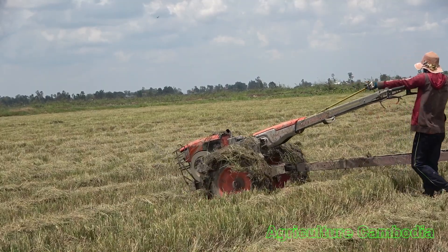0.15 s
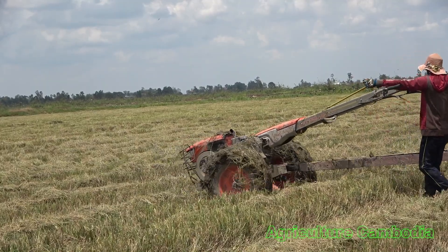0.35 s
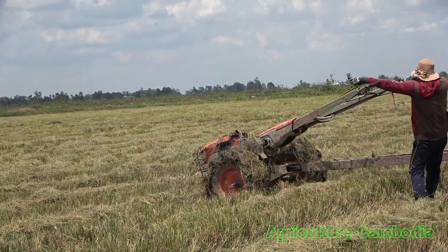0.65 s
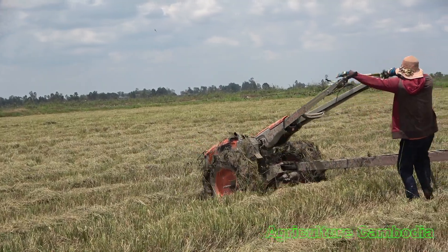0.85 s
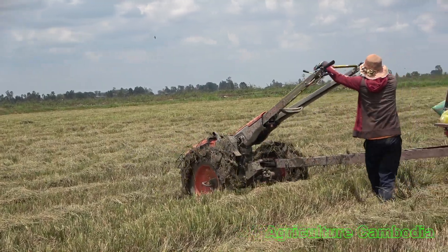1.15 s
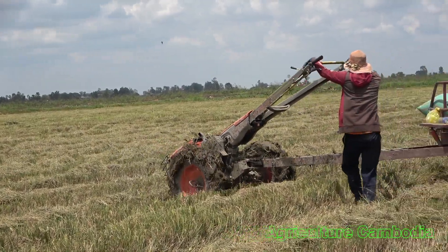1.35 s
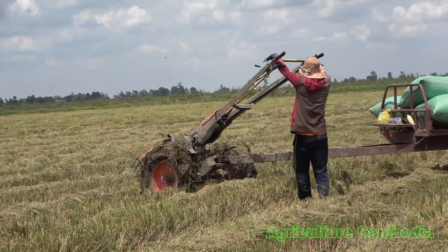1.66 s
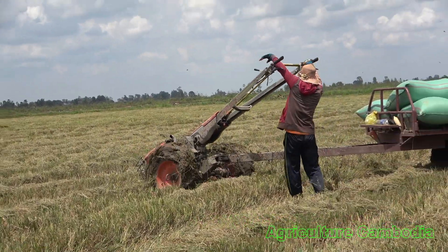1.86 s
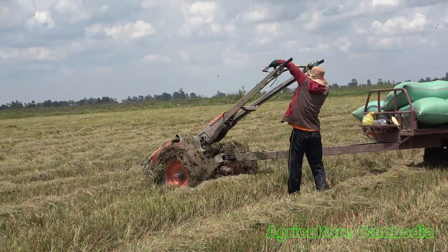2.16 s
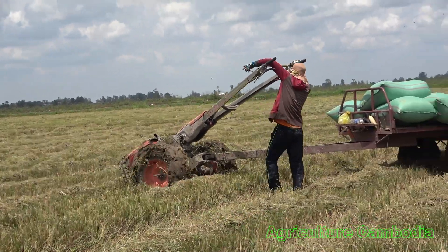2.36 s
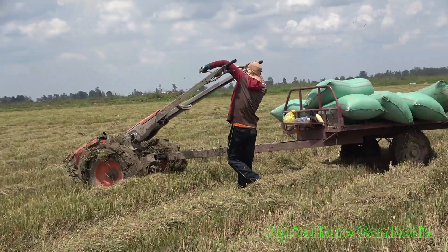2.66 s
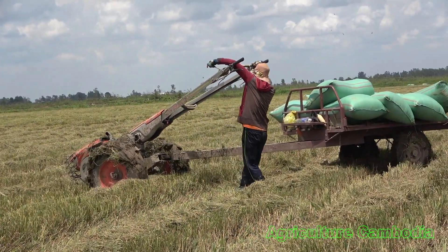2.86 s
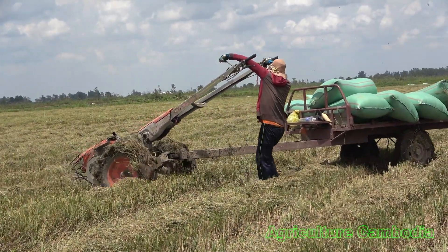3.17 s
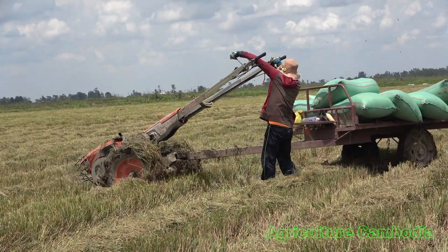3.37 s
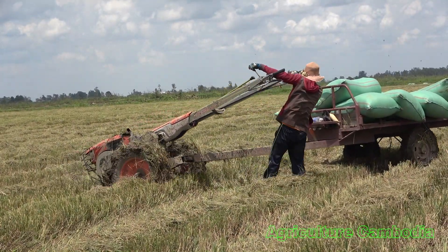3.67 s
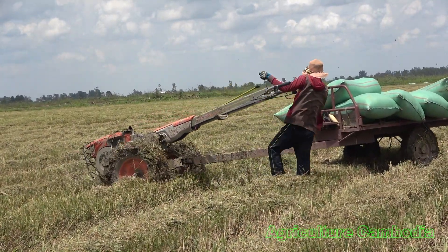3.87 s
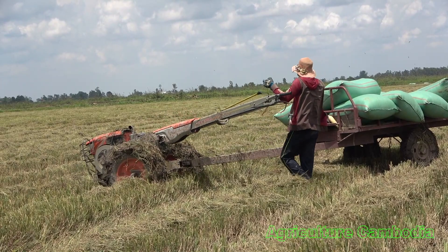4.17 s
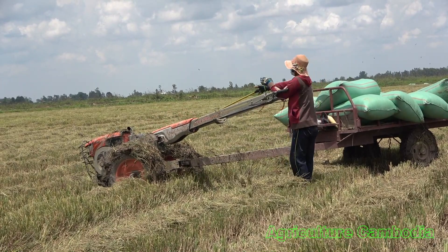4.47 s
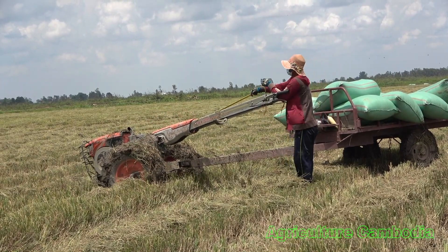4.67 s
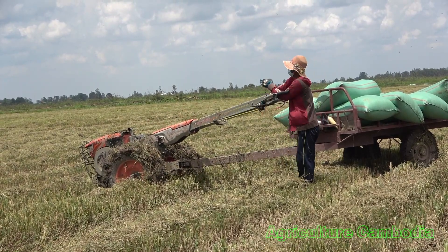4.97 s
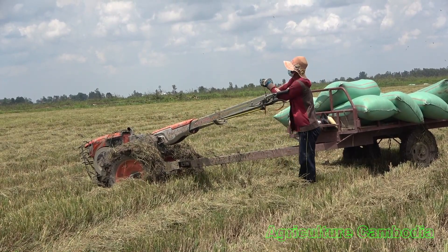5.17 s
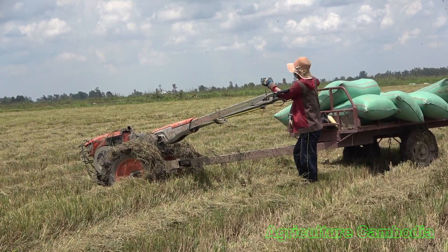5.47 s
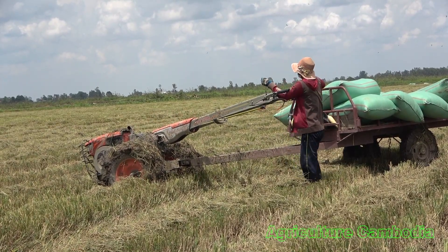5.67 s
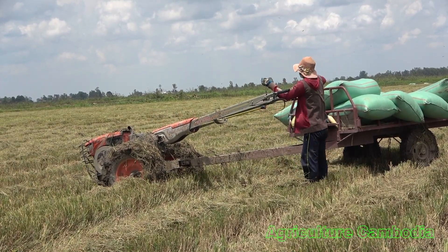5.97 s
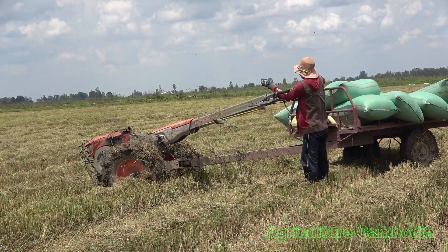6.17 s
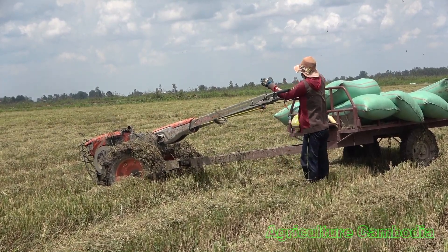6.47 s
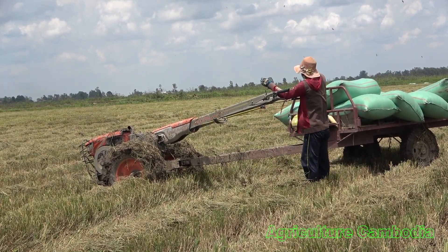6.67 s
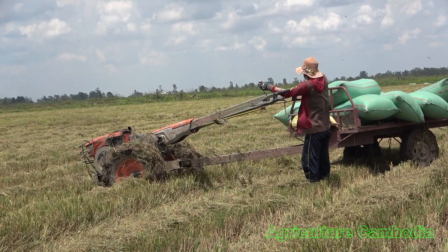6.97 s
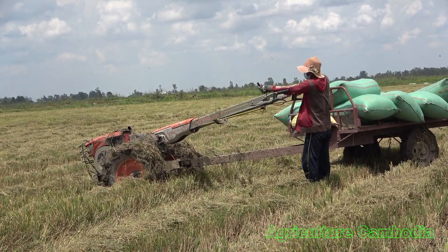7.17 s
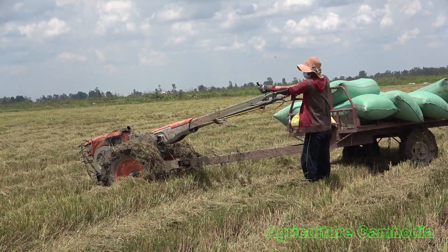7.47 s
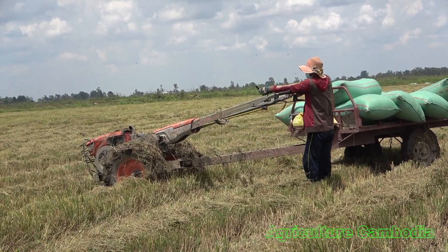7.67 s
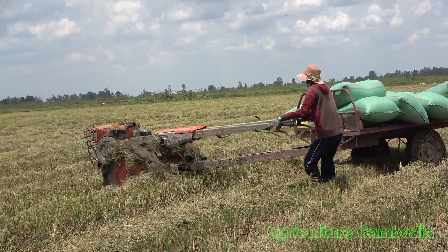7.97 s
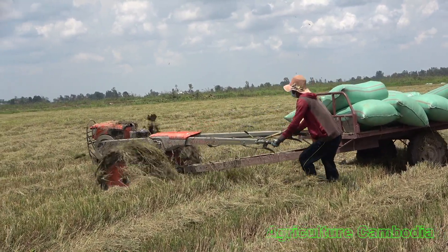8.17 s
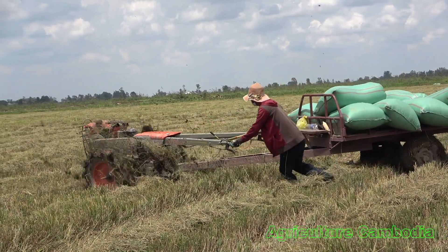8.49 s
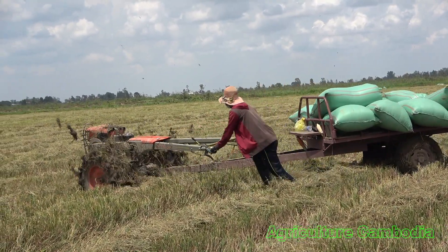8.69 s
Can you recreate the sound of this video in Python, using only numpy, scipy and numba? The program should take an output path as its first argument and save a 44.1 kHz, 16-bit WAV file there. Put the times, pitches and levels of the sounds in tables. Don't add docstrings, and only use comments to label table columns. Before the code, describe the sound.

A single-cylinder diesel two-wheel tractor works in an open, echo-free field, some metres from a hand-held microphone. A sharp click opens the sound, and chugging picks up to about thirteen firings per second by 0.6 s, each with a blocky knock, a burst of exhaust and a hollow muffler ring. From 0.6 to 3.2 s it labours, exhaust barks varying while valve clatter and gear whirr persist. Low wind rumbles throughout, with slaps near 1.1 s and a strong gust around 2.7-3.4 s. After 3.3 s the knock softens and the engine gradually slows, reaching about ten firings per second near 5.7 s; loose metal clacks at 4.8-5.6 s, with a faint lever ring. Around 6 s the throttle opens: blasts jump in loudness and quicken to about twenty per second by 7.7 s, staying fast, hard and knocking, with stronger gear whirr, the exhaust easing slightly towards the end at 8.8 s.

```python
import sys
import numpy as np
from scipy import signal
from scipy.fft import rfft, irfft
from scipy.io import wavfile
from scipy.ndimage import uniform_filter1d
from numba import njit

SR = 44100
rng = np.random.default_rng(int(sys.argv[2]) if len(sys.argv) > 2 else 0)


def gain_from_decibels(decibels):
    exponent = np.asarray(decibels, float) / 20
    return 10 ** exponent


def unload_audio(sound):
    columns = np.transpose(np.atleast_2d(sound))
    steps = np.round(np.clip(columns, -1, 1) * 32767)
    wavfile.write(sys.argv[1], SR, steps.astype(np.int16))


N = 389403

# time_s, speed (firings per s)
SPEED = [(0, 12.174), (.15, 11.531), (.57, 13.668), (2.03, 13.371), (2.86, 13.536), (4.62, 11.095),
         (5.7, 9.676), (5.78, 10.587), (5.96, 9.754), (6.48, 12.585), (6.86, 15.049), (7.71, 20.077),
         (8.83, 20.645)]
# time_s, blast_db (fuel), facing_db (muffler ring over blast), knock_db (load)
DRIVE = [(.066, -59, 8, -39.5), (.151, -30.5, 5.5, -37.5), (.62, -30, 1.5, -41), (1.15, -46.5, -6, -41),
         (1.75, -33.5, -11, -41.5), (2.03, -36, -19, -41), (2.55, -32, 0.5, -35.5),
         (3.12, -42.5, 14.5, -38.5), (3.25, -38.5, 0.5, -52), (4.7, -39.5, 6, -48), (5.65, -44, 12, -45),
         (5.888, -64, -9, -40.5), (5.987, -41, -6, -36), (6.088, -22.5, 2.5, -33.5),
         (7.05, -16.5, 1.5, -35), (7.25, -20.5, 7.5, -31.5), (8.45, -20.5, 2, -25.5), (8.83, -30, 5, -32)]
IDLE_PER_S = 11


def colour(points):
    hz, db = np.transpose(points)
    log_hz = np.log(np.arange(1, N // 2 + 2) * SR / N)
    gain = gain_from_decibels(np.interp(log_hz, np.log(hz), db))
    noise = irfft(rfft(rng.standard_normal(N)) * gain, N)
    return noise / noise.std()


def walk(rate):
    hold = int(SR / rate)
    held = np.repeat(rng.standard_normal(N // hold + 1), hold)
    smooth = uniform_filter1d(uniform_filter1d(held, hold), hold)[:N]
    return smooth / smooth.std()


def curves(table):
    time_s, *columns = np.transpose(table)
    return [np.interp(np.arange(N) / SR, time_s, column) for column in columns]


def puff(phase, start, rise, fall):
    up = np.sin(np.pi / 2 * np.clip((phase - start) / rise, 0, 1)) ** 2
    return up * np.exp(-np.clip(phase - start - rise, 0, None) / fall)


@njit
def resonate(x, hz, width):
    y, band, low = np.empty(len(x)), 0., 0.
    for i in range(len(x)):
        g = np.tan(np.pi * hz[i] / SR)
        k = width / hz[i]
        v = (band + g * (x[i] - low)) / (1 + g * (g + k))
        band = 2 * v - band
        low = low + 2 * g * v
        y[i] = k * v
    return y


def wind():
    # time_s, rumble_db (large eddies), buffet_db (middle eddies)
    gusts = [(0, -11.5, -18.5), (1.45, -17, -17.5), (2.3, -16.5, -26), (2.55, -29.5, -30),
             (2.83, -9.5, -20), (3.07, -18.5, -19), (3.16, -14, -8), (3.55, -14, -21), (3.9, -9.5, -8.5),
             (4.1, -18, -21), (4.45, -17, -21.5), (4.75, -22, -35), (4.87, -11, -17), (5.9, -15, -23.5),
             (6.5, -13, -17.5), (7.7, -19, -24), (7.9, -18.5, -27), (8.83, -16, -23)]
    # time_s, change_db, half_length_s
    surges = [(0.145, 7, 0.058), (.6, -3, 0.22), (1.15, 2, 0.059), (1.407, 6, 0.018), (1.665, 6, 0.12),
              (2.0, -2.5, 0.057), (2.72, 6, 0.039), (3.21, 0.5, 0.052), (3.437, 4.5, 0.04),
              (4.2, -0.5, 0.09), (4.393, 5.5, 0.051), (4.62, 3, 0.13), (4.88, 4, 0.037), (5.295, 1, 0.035),
              (5.48, -6.5, 0.11), (5.885, -5.5, 0.077), (6.137, 7.5, 0.11), (6.8, 2, 0.062),
              (7.135, 2.5, 0.08), (7.74, 3, 0.045), (8.1, 0.5, .08), (8.51, 3.5, 0.047)]
    # start_s, peak_db
    slap_times = [
        (1.117, -14.5),
        (2.716, -16.5),
        (2.906, -13.5),
        (3.15, -10),
        (3.2, -18),
        (3.44, -17),
        (4.824, -19.5),
        (5.643, -43),
        (6.438, -21),
    ]
    # pitch_hz, level_db
    rumble_colour = [(8, -34), (18, 14), (40, 16), (65, 8), (110, -8.5), (200, -67), (16000, -160)]
    buffet_colour = [(40, -11), (75, 1), (110, -4), (170, -13.5), (300, -30), (500, -86), (16000, -150)]
    flutter_colour = [(100, -5.5), (180, -4.5), (300, -6.5), (450, -14.5), (700, -26.5), (1200, -44.5),
                      (3000, -73), (16000, -130)]
    slap_colour = [(100, 4), (250, -3.5), (500, -10.5), (900, -21.5), (2000, -43), (16000, -120)]
    t = np.arange(N) / SR
    rumble_db, buffet_db = curves(gusts)
    surge_db = sum(db * np.exp(-((t - s) / half) ** 2) for s, db, half in surges)
    buffet_db = buffet_db + surge_db
    flutter_db = -30 + 0.41 * (buffet_db + 18)
    eddy, shove = walk(25), walk(9)
    rumble = gain_from_decibels(rumble_db + 0.21 * surge_db + 0.3 * shove) * colour(rumble_colour)
    buffet = gain_from_decibels(buffet_db + 1.04 * eddy + 1.34 * shove) * colour(buffet_colour)
    lumps_db = 1.6 * eddy + 2.4 * walk(60) + shove
    flutter = gain_from_decibels(flutter_db - 1.5 + lumps_db) * colour(flutter_colour)
    slaps = colour(slap_colour) * sum(gain_from_decibels(db - 2.0) * puff(t, s, 0.0068, 0.0078) for s, db in slap_times)
    swell = gain_from_decibels(0.8 * walk(3.963))
    return swell * (rumble + buffet + flutter) + slaps


def linkage():
    # start_s, peak_db, decay_s
    clack_times = [
        (0.001, -30, 0.00045),
        (3.2, -52, 0.0035),
        (4.756, -49, .004),
        (4.791, -37, 0.012),
        (4.85, -52, 0.0028),
        (5.118, -47, 0.0052),
        (5.618, -50.5, 0.0097),
        (5.337, -59, 0.0043),
    ]
    # start_s, pitch_hz, peak_db, decay_s
    lever_rings = [
        (5.158, 1930, -52, .07),
        (5.325, 1895, -44, .012),
    ]
    # pitch_hz, level_db
    clack_colour = [(1500, -25), (4000, 1.5), (7000, 0), (11000, -8), (15500, -22)]
    t = np.arange(N) / SR
    rings = sum(gain_from_decibels(db) * puff(t, s, 0.0043, fall) * np.sin(2 * np.pi * hz * t)
                for s, hz, db, fall in lever_rings)
    strikes = sum(gain_from_decibels(db) * puff(t, s, 0.00051, fall) for s, db, fall in clack_times)
    return rings + colour(clack_colour) * strikes


def mesh(revs):
    case_hz, width_hz = np.full(N, 2226.), 400.
    teeth = gain_from_decibels(2.5 * walk(200)) * rng.standard_normal(N)
    ring = resonate(resonate(teeth, case_hz, width_hz), case_hz, 2 * width_hz)
    return gain_from_decibels(-69 + 2 * revs + 1.5 * walk(3.4)) * ring / ring.std()


def firings():
    # time_s, change_db (from the usual ring)
    odd_firings = [(.319, 6.5), (.398, -2), (.474, 2), (1.432, 17), (4.192, 5.5), (4.815, 7), (6.182, -22),
                   (6.268, 4.5), (6.518, -4), (6.594, 5), (6.809, -19), (7.004, -7), (7.467, -3),
                   (7.972, 0), (8.021, 7), (8.07, 5), (8.22, -2), (8.268, 4.5), (8.417, 5.5), (8.465, 8.5),
                   (6.667, 4), (7.127, 1), (7.358, 1.5), (7.412, -1.5), (7.725, 5.5), (2.848, 1),
                   (5.488, 2.5), (8.66, 6)]
    cycle = -0.793 + np.cumsum(curves(SPEED)[0]) / SR
    even = np.interp(np.arange(int(cycle[-1]) + 1), cycle, np.arange(N) / SR)
    chance = np.clip(rng.standard_normal((len(even), 4)).T, -2, 2)
    time_s, *controls = np.transpose(DRIVE)
    blast_db, facing_db, knock_db = (np.interp(even, time_s, control) for control in controls)
    odd_db = sum(db * (abs(even - at) < 0.012) for at, db in odd_firings)
    ring_db = blast_db + facing_db + np.where(odd_db == 0, 2.0 * chance[2], odd_db)
    blast_s = even + 0.0006 * chance[0]
    return even, (blast_s, blast_db + 1.25 * chance[1], ring_db, knock_db + 1.6 * chance[3])


def crank(s):
    s = np.r_[2 * s[0] - s[1], s, 2 * s[-1] - s[-2]]
    cycle = np.interp(np.arange(N) / SR, s, np.arange(len(s)) - 1.)
    number = np.clip(np.round(cycle), 0, len(s) - 3).astype(int)
    return number, np.clip(cycle - number, -.5, .5)


def block(number, phase, fired, seating_db, gears_db, tappet_db):
    # pitch_hz, level_db
    knock_colour = [(200, -23), (600, -6), (1250, 12), (1900, 0), (2450, -1), (3050, -1.5), (3500, -10.5),
                    (4200, -22), (5500, -10), (6200, -24), (7100, -12.5), (8000, -39), (11000, -18.5),
                    (15500, -63)]
    tappet_colour = [(2000, -30), (5200, 0), (6200, -12), (7050, -1), (8000, -16), (11500, -19),
                     (15500, -38)]
    gears_colour = [(200, -33.5), (600, -3), (900, -8), (1220, 3.5), (1600, -10), (2300, -12.5),
                    (2700, -15.5), (4000, -18), (5500, -18), (6200, -28), (7100, -29), (8000, -29),
                    (11300, -30), (15500, -41)]
    knock_db = fired[3]
    burn = puff(phase, -.275, .02, .08) + gain_from_decibels(-3) * puff(phase, -.27, .14, .22)
    seating = puff(phase - 0.21, -0.071, 0.07, 0.1)
    blow = gain_from_decibels(knock_db[number] - 0.5) * burn + gain_from_decibels(seating_db) * seating
    ragged = gain_from_decibels(2.2 * walk(250))
    uneven = gain_from_decibels(2.4 * rng.standard_normal((len(knock_db), 2))[number].T - 4)
    tappets = uneven[0] * puff(phase, -.44, .08, .1) + gain_from_decibels(-2) * uneven[1] * puff(phase, .17, .03, .04)
    tick = gain_from_decibels(seating_db - 2) * uneven[1] * puff(phase, 0.11, .03, .05)
    tick = tick * ragged * colour([*tappet_colour, (20000, -60)])
    gears = gain_from_decibels(gears_db + 1.7 * walk(60) + walk(8)) * colour(gears_colour)
    return blow * ragged * colour(knock_colour) + gain_from_decibels(tappet_db) * tappets * colour(tappet_colour) + gears + tick


def pipe(even, level_db):
    # pitch_hz, width_hz, level_db
    pipe_modes = [(220, 40, -2), (280, 40, 0), (400, 70, -17), (570, 70, -9), (750, 90, -18)]
    _, phase = crank(even)
    steps = .75 * puff(phase, .26, .006, .006) - puff(phase, -.07, .006, .006)
    thump = sum(gain_from_decibels(db) * resonate(steps, np.full(N, 1. * hz), 1. * width) for hz, width, db in pipe_modes)
    steady = thump / uniform_filter1d(thump ** 2, size=SR // 4) ** .5
    return gain_from_decibels(level_db + 0.7 * walk(30)) * steady


def exhaust(number, phase, fired):
    # pitch_hz, level_db
    blast_colour = [(150, -29), (450, 7.5), (800, 6.5), (1500, 16.5), (2000, 10), (2700, 6.5), (3500, 7),
                    (4200, 4.5), (5200, 8), (6100, -2.5), (7000, -2.5), (9000, -6), (12000, -10),
                    (15500, -25)]
    s, blast_db, ring_db, _ = fired
    since = np.arange(N) / SR - s[number]
    jet = puff(since, -.0056, .006, .0034)
    jet = jet + gain_from_decibels(-33.5) * puff(phase, 0.039, 0.2, 0.062)
    rough_jet = jet * gain_from_decibels(1.0 * walk(300)) * colour(blast_colour)
    bright = resonate(rng.standard_normal(N), np.full(N, 10500.), 7000.)
    crack = gain_from_decibels(2.2 * walk(140)) * puff(since, -0.0014, 0.0018, 0.0035) * bright
    hiss = gain_from_decibels(blast_db[number]) * (rough_jet + 0.065 * crack)
    can_hz, width_hz = 1220 * (1 + .033 * rng.standard_normal((len(s), 1))[number, 0]), 150.
    gas = puff(since, -0.0037, 0.0036, 0.0041) + gain_from_decibels(-20.5) * puff(phase, -0.19, 0.16, 0.043)
    gas = gas * rng.standard_normal(N)
    ring = resonate(gas, can_hz, width_hz) + gain_from_decibels(-12) * resonate(gas, 1.285 * can_hz, 2.5 * width_hz)
    ring = resonate(ring, 1.03 * can_hz, 3.2 * width_hz)
    peak = np.maximum.reduceat(np.abs(ring), np.searchsorted(number, np.arange(len(s))))
    return hiss + ring * (gain_from_decibels(ring_db + 2) / (peak + 1e-9))[number]


def scene():
    t = np.arange(N) / SR
    air = wind()
    even, fired = firings()
    number, phase = crank(fired[0])
    revs = curves(SPEED)[0] - IDLE_PER_S
    load_db = curves(DRIVE)[2] + 45
    drag = np.clip(np.minimum(t - .62, 3.27 - t) / 0.22, 0, 1)
    slack = uniform_filter1d(1. * ((phase < -.28) | (phase > .36)), size=200)
    gears_db = -47 + 0.99 * revs + 0.07 * load_db + (1 - 3 * slack) * drag
    gears_db = gears_db - 5 * np.clip((0.71 - t) / 0.13, 0, 1)
    seating_db = -53 - 0.53 * revs + 0.86 * load_db + 8 * drag
    tappet_db = -52 - 5 * drag
    engine = exhaust(number, phase, fired) + pipe(even, -44 + 1.62 * revs)
    engine = engine + block(number, phase, fired, seating_db, gears_db, tappet_db)
    return (engine + mesh(revs) + linkage() + air)[None]


def roll_off(x):
    return signal.sosfilt(signal.butter(12, 15780, fs=SR, output="sos"), x)


def record(dry):
    rounded = dry / (1 + np.abs(dry) ** 12) ** (1 / 12)
    return roll_off(rounded)


dry = scene()
out = record(dry)
unload_audio(out)
```